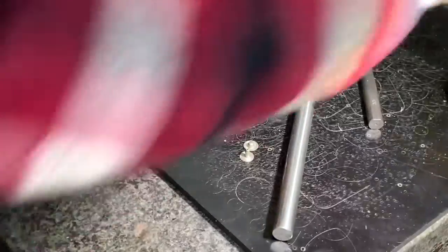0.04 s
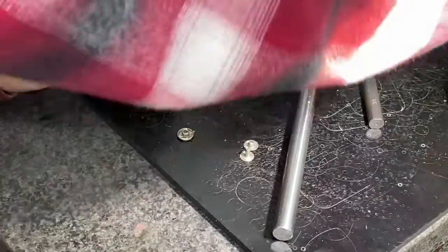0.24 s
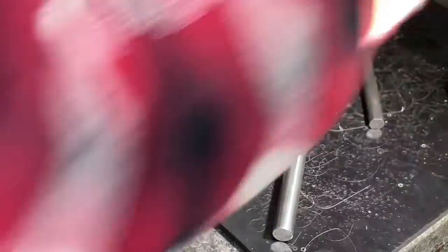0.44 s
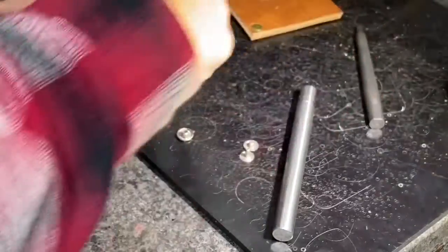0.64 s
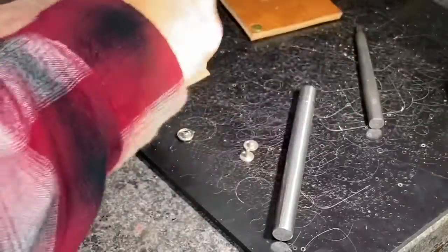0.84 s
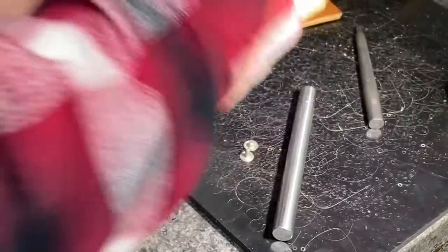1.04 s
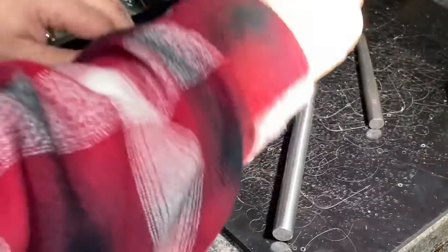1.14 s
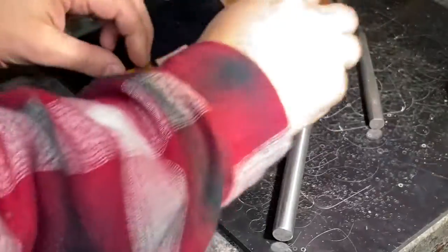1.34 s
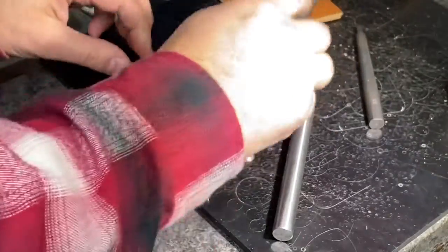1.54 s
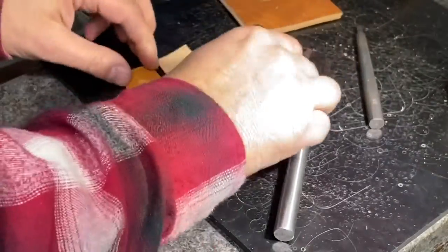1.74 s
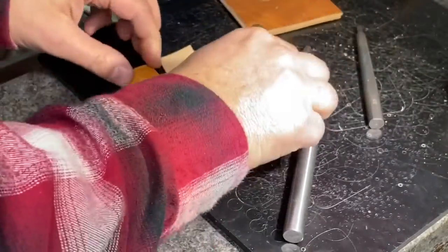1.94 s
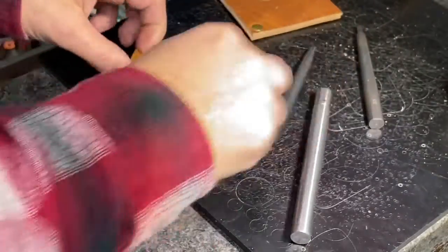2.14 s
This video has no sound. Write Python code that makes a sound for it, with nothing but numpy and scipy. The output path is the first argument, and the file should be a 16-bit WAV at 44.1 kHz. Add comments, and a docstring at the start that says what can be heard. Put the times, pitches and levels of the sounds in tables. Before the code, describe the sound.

A hammer drives a steel punch through leather with one heavy thud that shakes the workbench. Small fasteners jingle, a steel tool bounces to rest, then tools are set down with knocks, heard close in a small workshop.

```python
"""Punching leather at the bench

A hammer drives a steel punch through leather: one heavy double thud that shakes the workbench.
Loose snap fasteners jump and jingle, and a steel tool bounces to rest in quickening taps.
Tools are set down on the slab with knocks, over sleeve rustle and a small workshop's low hum."""
import sys
import numpy as np
from scipy import signal
from scipy.fft import rfft, irfft
from scipy.io import wavfile
from scipy.ndimage import uniform_filter1d

SR = 44100
rng = np.random.default_rng(int(sys.argv[2]) if len(sys.argv) > 2 else 0)


def master(y):
    """Save y as 16-bit WAV."""
    cut = np.clip(np.atleast_2d(y).T, -1, 1)
    pcm = np.round(cut * 32767)  # scale
    wavfile.write(sys.argv[1], SR, pcm.astype(np.int16))


N = 97020
T = np.arange(SR) / SR  # time after a hit, t/s


# hits of the blow and its rebound: t/s, thud/dB, bench/dB, slab/dB, crack/dB
BLOWS = [(0.2183, -17.5, -30.5, -18, -17), (0.2205, -4, -12, 3.5, -20), (0.2235, -3.5, 1.5, 1, -24),
         (0.243, -12.5, -8.5, -4.5, -33), (0.2490, -4, 2.5, -2.5, -12.5), (0.2515, -2.5, -12, 4.5, -15.5),
         (0.2563, -7.5, 0.5, -7, -24.5), (0.2687, -12, -17, -13.5, -26)]
# body of the thud, the bench's dense ring: f/Hz, level/dB
THUD_COLOUR = [(40, -44.5), (80, -25.5), (160, -12.5), (320, -1), (620, -8), (780, -8), (1000, -16.5),
               (1300, -19), (2000, -17.5), (3300, -33), (5000, -41), (7500, -52), (10500, -50.5),
               (12500, -73.5), (14200, -59)]
# how long that body hangs on: f/Hz, t60/s
THUD_DECAY = [(80, 0.1), (300, 0.11), (1000, 0.15), (3000, .07), (12000, 0.28)]
# crack on the front of each hit: f/Hz, level/dB
CRACK_COLOUR = [(100, -37), (900, -3), (2400, 1), (4000, -20), (7000, -29), (15000, -42)]
# low notes of the bench: f/Hz, level/dB, t60/s
BENCH_MODES = [(230, -21, 0.095), (296.3, -19, 0.08), (330.1, -10, 0.11), (423.5, -15, 0.055)]
# ring of the slab under the leather: f/Hz, level/dB, t60/s
SLAB_MODES = [(581.6, -22.5, 0.078), (638, -22, .07), (706.6, -23, .11), (852.6, -26, 0.07),
              (928, -24, 0.082), (1004.8, -21, 0.13), (1546, -23.5, .07), (1996, -33, 0.046),
              (2183, -36.5, 0.087), (2604, -30.5, 0.03)]
# the punch sings as the hammer leaves it: t/s, level/dB
PUNCH_RINGS = [(0.2235, -26.5), (0.2543, -30.5)]
# bright steel of the punch: f/Hz, level/dB, t60/s
PUNCH_MODES = [(3979, -5, 0.045), (5050, -1.5, .035), (5230, -4, .04)]
# deep shudder of the whole bench: f/Hz, level/dB, t60/s
SHUDDER_MODES = [(58.44, -34.5, .55), (104, -31, 0.43), (172, -19.5, 0.26)]

def hammer(low_cut_hz=160, shudder_s=0.243):
    """Each hit cracks and rings slab and bench; the bench shudders as the punch bottoms out."""
    out = np.zeros((2, N))
    for s, thud_db, bench_db, slab_db, crack_db in BLOWS:
        body = amp(-12.5) * tail(THUD_COLOUR, THUD_DECAY, size=12000, rise_cycles=1.2)
        add(out, s, amp(thud_db) * body)
        add(out, s, amp(crack_db) * burst(CRACK_COLOUR, t60=0.022, rise_s=0.00035))
        add(out, s, amp(bench_db) * ring(BENCH_MODES, rise_s=0.00038, spread=0.2))
        add(out, s, amp(slab_db) * ring(SLAB_MODES, rise_s=0.00028))
    for s, db in PUNCH_RINGS:
        add(out, s, amp(db) * chatter(ring(PUNCH_MODES, rise_s=0.00076), rough=0.7))
    low_cut = signal.butter(2, low_cut_hz, "high", fs=SR, output="sos")
    heard = room(signal.sosfilt(low_cut, out), wet_db=-13, build_s=0.01)
    add(heard, shudder_s, ring(SHUDDER_MODES, rise_s=0.017, spread=0.3, size=SR))
    return heard


# tools set down on the slab: t/s, hollow ring/dB, hard ring/dB, clack/dB, tick/dB
KNOCKS = [(0.072, -54, -66, -49, -72), (0.8718, -37, -40.5, -44.5, -54),
          (0.8776, -44.5, -42.5, -51.5, -41.5), (0.8801, -33, -36, -38, -58),
          (1.7285, -10.5, -35, -27, -52.5), (1.8724, -36.5, -59, -53, -75), (1.902, -23, -7, -19, -33)]
# the slab's lower, hollow ring: f/Hz, level/dB, t60/s
HOLLOW_MODES = [(606, 5, 0.031), (568, -22, .1), (644, -22.5, .07), (680, -11, 0.022), (845.5, -4.5, 0.023),
                (1013, -17, 0.027), (1530, -18.5, 0.021)]
# its higher, harder ring: f/Hz, level/dB, t60/s
HARD_MODES = [(165, -23.5, 0.043), (1042, -0.5, 0.018), (1150, -6.5, 0.016), (2110, -12.5, 0.01),
              (3450, -16.5, 0.009)]
# midrange clack of the landing: f/Hz, level/dB
CLACK_COLOUR = [(60, -21), (300, -1.5), (900, 8), (1600, 0.5), (2300, -6.5), (3500, -11.5), (4300, -19.5),
                (5600, -21), (8000, -32), (15000, -59)]
# crisp metal tick, also on the fasteners: f/Hz, level/dB
TICK_COLOUR = [(1000, -29), (4000, -5.5), (7000, 7), (10000, -4.5), (14000, -7), (16000, 3.5)]
# the tool rings until the hand damps it: t/s, shank/dB, tip/dB, t60/s
TOOL_RINGS = [(0.8775, -50.5, -72, 0.056), (1.73, -51.5, -55, .08), (1.901, -61, -50.5, 0.08)]
# slap off nearby surfaces: delay/s, left gain, right gain
ECHOES = [(0.0126, 0.064, 0.05), (0.0181, 0.11, 0.015), (0.0216, .07, 0.03)]

def tool_knocks(shank_hz=4590, tip_hz=10470):
    """Steel meets the slab: a tick, a hollow knock and a thin ring, with close reflections."""
    rings, clacks = np.zeros((2, 2, N))
    for s, hollow_db, hard_db, clack_db, tick_db in KNOCKS:
        hollow = ring(HOLLOW_MODES, rise_s=0.0042, spread=0.57)
        add(rings, s, amp(hollow_db) * chatter(hollow, rough=0.15))
        add(rings, s, amp(hard_db) * ring(HARD_MODES, rise_s=0.0014, spread=0.19))
        add(clacks, s, amp(clack_db) * burst(CLACK_COLOUR, t60=0.022, rise_s=0.00036))
        add(clacks, s, amp(tick_db) * burst(TICK_COLOUR, t60=0.013, rise_s=0.000067))
    for s, shank_db, tip_db, t60 in TOOL_RINGS:
        steel = ring([(shank_hz, shank_db, t60), (tip_hz, tip_db, t60)], rise_s=0.00036)
        add(rings, s, chatter(steel, rough=0.99))
    heard = room(rings, wet_db=-19, build_s=0.015) + room(clacks, wet_db=-12.5, build_s=0.0017)
    for delay, left, right in ECHOES:
        add(heard, delay, (rings + clacks) * np.array([[left], [right]]))
    return heard


# landings, closer and softer as the tool settles: t/s, ring/dB, tap/dB, bench/dB
BOUNCES = [(0.3850, -32.5, -24.5, -24), (0.4330, -50, -33.5, -31), (0.4672, -65, -38, -36.5),
           (0.4918, -61, -45.5, -40.5), (0.508, -65, -66.5, -43)]
# short ping of the steel rod: f/Hz, level/dB, t60/s
ROD_MODES = [(2030, 4, 0.012), (2230, -0.5, 0.031), (3670, -9, 0.054), (5560, 7, 0.022),
             (6950, -8.5, 0.018), (11200, -14.5, 0.011)]
# sharp tap of a landing: f/Hz, level/dB
TAP_COLOUR = [(600, -5.5), (1500, 0), (2150, 13), (2800, -4.5), (3600, -9), (4300, -23), (5600, -8),
              (7500, -29), (11000, -27.5), (15000, -48)]
# dull bench rattle underneath: f/Hz, level/dB
RATTLE_COLOUR = [(30, -19), (60, -1.5), (180, 2), (340, 2.5), (520, -5), (760, 2.5), (1100, -10.5),
                 (1750, -8.5), (3000, -25), (6000, -40), (14000, -54)]

def bouncing_tool():
    """A steel rod lands again and again: a short ping, a tap and a rattle of the bench."""
    rod, bench = np.zeros((2, 2, N))
    for s, ring_db, tap_db, bench_db in BOUNCES:
        add(rod, s, amp(ring_db) * ring(ROD_MODES, rise_s=0.001, spread=0.36))
        add(rod, s, amp(tap_db) * burst(TAP_COLOUR, t60=0.017, rise_s=0.000095))
        add(bench, s, amp(bench_db) * burst(RATTLE_COLOUR, t60=0.12, rise_s=0.0022, size=12000))
    return room(rod, wet_db=-16.5, build_s=0.006) + room(bench, wet_db=-10.5, build_s=0.017)


# fasteners jumping on the slab: t/s, level/dB
JINGLES = [(0.2187, -37), (0.2275, -42), (0.2364, -41.5), (0.2505, -43.5), (0.268, -36.5)]
# sparkle of a snap fastener: f/Hz, level/dB, t60/s
SNAP_MODES = [(9430, -4, .05), (9830, 1.5, .04), (10177, 0, 0.035), (14200, -13, 0.042)]
# tiny metal parts touching: t/s, ring/dB, tick/dB
TINKS = [(0.5543, -43, -51.5), (0.5626, -52.5, -49.5), (0.9436, -82, -65), (1.227, -73, -68),
         (1.9102, -55.5, -41.5)]
# their glassy ring: f/Hz, level/dB, t60/s
TINK_MODES = [(5240, -18, 0.039), (9580, -2, 0.055), (9850, -22, 0.021), (13350, 12, 0.033),
              (13800, 1, 0.049)]
# one fastener ringing freely: f/Hz, level/dB, t60/s
PING_MODES = [(7170, -2.5, 0.22), (9630, -13, 0.14), (11600, -8, 0.16), (13720, 1, 0.18)]

def fasteners(ping_s=0.9436):
    """Small metal parts jingle under the blow and clink afterwards."""
    out = np.zeros((2, N))
    for s, db in JINGLES:
        jingle = ring(SNAP_MODES, rise_s=0.00013, spread=0.8)
        add(out, s, amp(db) * chatter(jingle, rough=0.28))
    for s, ring_db, tick_db in TINKS:
        tink = ring(TINK_MODES, rise_s=0.000374, spread=0.78)
        add(out, s, amp(ring_db) * chatter(tink, rough=0.9))
        add(out, s, amp(tick_db) * burst(TICK_COLOUR, t60=0.05, rise_s=0.00046))
    add(out, ping_s, amp(-62) * chatter(ring(PING_MODES, rise_s=0.0005), rough=0.4))
    return room(out, wet_db=-20, build_s=0.016)


# sleeve and leather sliding: peak t/s, length/s, level/dB, centre f/Hz, width/octaves
SWISHES = [(0.133, 0.98, -68.5, 4140, 4.5), (0.589, 0.18, -81, 6950, 1.03), (0.783, 0.079, -80, 7005, 1.14),
           (1.015, 0.23, -73, 4188, 0.93), (1.1, 0.058, -87, 5480, 0.88), (1.253, 0.1, -73, 9650, 1.5),
           (2.007, 0.42, -78, 6860, 0.7), (2.024, 0.19, -72, 11270, 0.12)]
# airy hiss of cloth: f/Hz, level/dB
CLOTH_COLOUR = [(500, -4), (2200, 3), (3200, -5), (4500, -0.5), (7000, -1), (8500, -6.5), (10500, -3.5),
                (12500, -17), (14200, 6.5), (16000, -13.5)]

def sleeve(rough=0.21):
    """Cloth and leather brush past in soft, grainy swells."""
    t, hz = np.arange(N) / SR, np.fft.rfftfreq(N, 1 / SR)
    out = np.zeros((2, N))
    rustle = rfft(noise(CLOTH_COLOUR, N) * np.exp(rough * wobble(N, smooth=200)))
    for s, length, db, centre_hz, octaves in SWISHES:
        band = np.exp(-0.5 * (np.log2((hz + 1) / centre_hz) / octaves) ** 2)
        swell = np.exp(-(2 * (t - s) / length) ** 2)
        out += amp(db) * unit(irfft(rustle * band, N)) * swell
    return out


# low bed of room tone: f/Hz, level/dB
AIR_COLOUR = [(20, -34.5), (38, -9.5), (58, 2), (100, -11.5), (200, -18.5), (360, -27.5), (600, -29.5),
              (1000, -38.5), (2000, -52), (5000, -53), (10000, -60.5), (15500, -63)]
# notes of the workshop's hum: f/Hz, level/dB
HUM = [(53.8, -67.5), (59, -65), (241, -73), (360.7, -78)]

def workshop(air_db=-56, waver_hz=3.5, dip_s=1, dip_half_width_s=0.055, dip_db=-7):
    """Low background rumble with a wavering hum; the level dips briefly."""
    t = np.arange(N) / SR
    out = amp(air_db) * noise(AIR_COLOUR, N)
    for hz, db in HUM:
        drift = waver_hz * wobble(N, smooth=6000)
        cycles = np.cumsum(hz + drift) / SR + rng.random()
        out += amp(db) * np.sqrt(2) * np.sin(2 * np.pi * cycles)
    dip = np.exp(-((t - dip_s) / dip_half_width_s) ** 2)
    return out * amp(dip_db * dip)


# tone of the reverb: f/Hz, level/dB
ROOM_COLOUR = [(50, 11.5), (150, 4.5), (400, -0.5), (1000, -5.5), (2500, 1.5), (6000, -0.5), (15000, 2)]
# its tail, longest in the bass: f/Hz, t60/s
ROOM_DECAY = [(60, 0.76), (200, 0.49), (600, 0.27), (2000, 0.22), (6000, 0.24), (14000, 0.13)]

def room(x, wet_db, build_s):
    """Adds the workshop's reverb, which builds up just after the direct sound."""
    build = 1 - np.exp(-(T / build_s) ** 2)
    echo = tail(ROOM_COLOUR, ROOM_DECAY, size=SR, rise_cycles=0.43) * build
    wet = signal.fftconvolve(x, echo / np.linalg.norm(echo[0]), axes=1)[:, :N]
    return x + amp(wet_db) * wet


# stereo width of every noise and ring: f/Hz, side level/dB
WIDTH = [(60, -23), (200, -12.5), (380, -10), (700, -4.5), (1300, -3), (2400, -16), (4400, -23.5),
         (8000, -5), (15000, 1)]

def noise(colour, size):
    """Stereo noise of the given colour at rms 1, near mono in the bass."""
    hz = np.fft.rfftfreq(size, 1 / SR)
    mid, side = np.exp(2j * np.pi * rng.random((2, len(hz)))) * amp(read(colour, hz))
    side = side * amp(read(WIDTH, hz))
    return unit(irfft(np.array([mid + side, mid - side]), size))


def ring(modes, rise_s, spread=0.43, size=12000):
    """Damped modes; each reaches left and right slightly out of step."""
    t, out = T[:size], np.zeros((2, size))
    for k, (hz, db, t60) in enumerate(modes):
        skew = spread * (-1) ** k * amp(read(WIDTH, hz)) * np.array([[1], [-1]])
        out += amp(db) * fade(t, t60) * np.sin(2 * np.pi * hz * t + skew)
    return out * (1 - np.exp(-t / rise_s))


def burst(colour, t60, rise_s, size=4096):
    """Many crowded modes, struck together and dying together."""
    t = T[:size]
    return noise(colour, size) * fade(t, t60) * (1 - np.exp(-t / rise_s))


def tail(colour, decay, size, rise_cycles):
    """Dense ringing: each band swells over its first cycles and dies at its own speed."""
    t, hz = T[:size], np.fft.rfftfreq(size, 1 / SR)
    spectrum = rfft(noise(colour, size))
    centres = [f for f, _ in decay]
    out = np.zeros((2, size))
    for share, (f, t60) in zip(np.eye(len(decay)), decay):
        band = irfft(spectrum * read(list(zip(centres, share)), hz), size)
        out += band * fade(t, t60) * (1 - np.exp(-t * f / rise_cycles))
    return out


def chatter(sound, rough):
    """Loose metal buzzes against what it lies on, which roughens its ring."""
    flutter = wobble(sound.shape[1], smooth=60)
    return sound * (1 + rough * flutter) / np.sqrt(1 + rough ** 2)


def wobble(size, smooth):
    """Random movement at rms 1, averaged over `smooth` samples."""
    return unit(uniform_filter1d(rng.standard_normal(size), size=smooth))


def fade(t, t60):
    """Exponential decay by 60 dB in t60."""
    return np.exp(-np.log(1000) * t / max(t60, 1e-4))


def amp(db):
    """Decibels to gain."""
    return 10 ** (np.asarray(db) / 20)


def unit(x):
    """Scales to rms 1."""
    return x / np.sqrt(np.mean(x ** 2) + 1e-20)


def read(points, hz):
    """Reads a table on a log-frequency axis."""
    f, value = np.transpose(points)
    return np.interp(np.log(hz + 1), np.log(f + 1), value)


def add(mix, s, sound):
    """Mixes a stereo sound in at time s."""
    part = mix[:, max(round(s * SR), 0):][:, :sound.shape[1]]
    part += sound[:, :part.shape[1]]


def scene():
    """Everything on and around the bench."""
    return hammer() + bouncing_tool() + fasteners() + tool_knocks() + sleeve() + workshop()


# microphone EQ: f/Hz, level/dB
MIC_COLOUR = [(15, -22), (30, -12.5), (50, 4), (7900, -3), (8500, -8), (9200, -1), (11300, -1),
              (12400, -18), (13500, -6), (15000, -3), (16000, -9)]

def record(dry):
    """Microphone colour, soft overload and a steep high cut."""
    hz = np.fft.rfftfreq(N, 1 / SR)
    coloured = irfft(rfft(dry) * amp(read(MIC_COLOUR, hz)), N)
    clipped = coloured / (1 + coloured ** 8) ** (1 / 8)
    high_cut = signal.firwin(511, cutoff=15900, window=("kaiser", 9), fs=SR)
    return signal.oaconvolve(clipped, high_cut[None], "same")


dry = scene()
out = record(dry)
master(out)
```